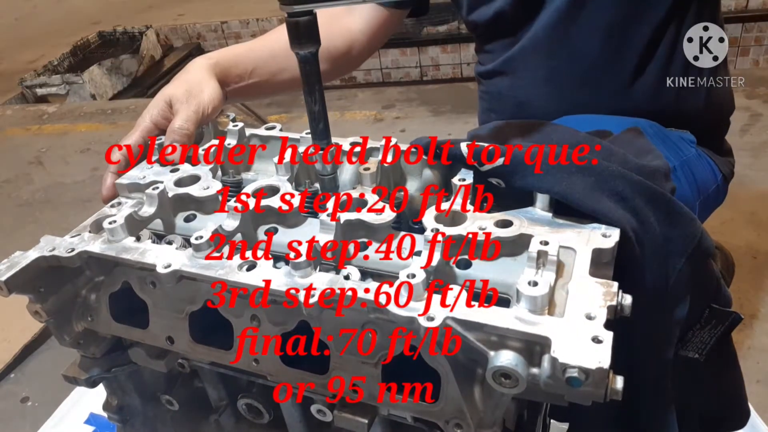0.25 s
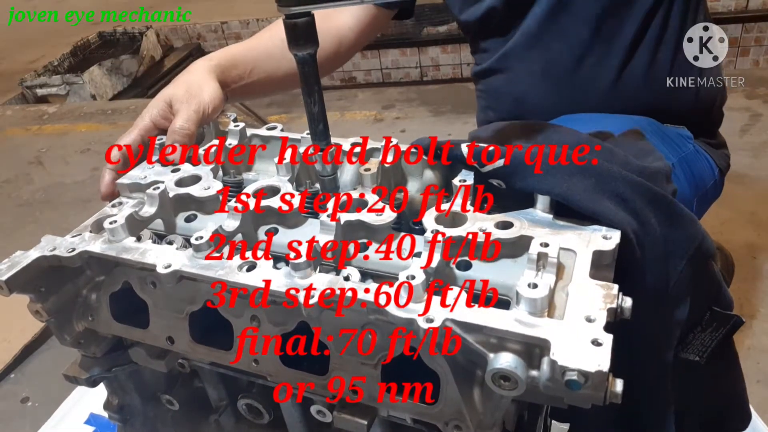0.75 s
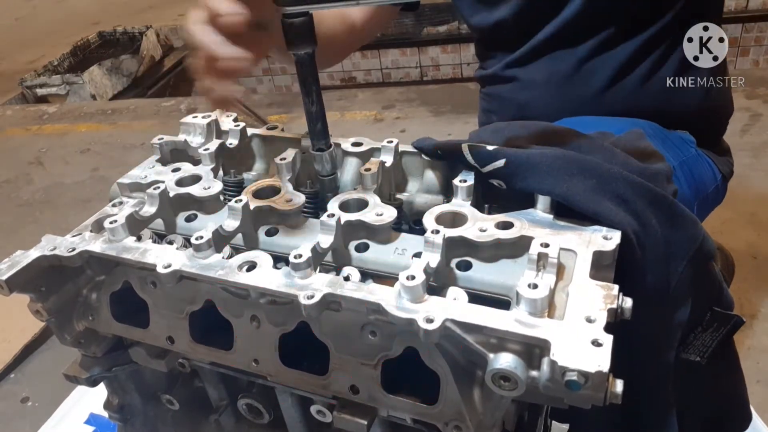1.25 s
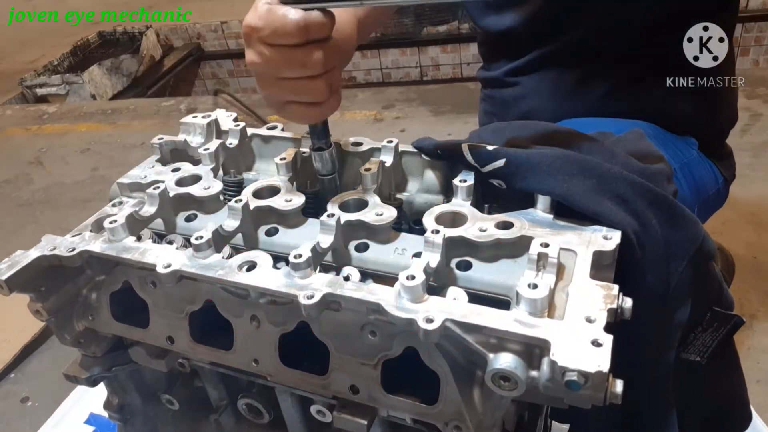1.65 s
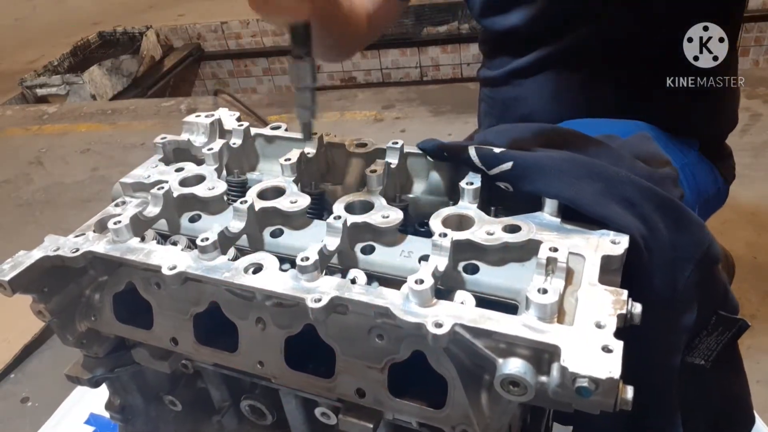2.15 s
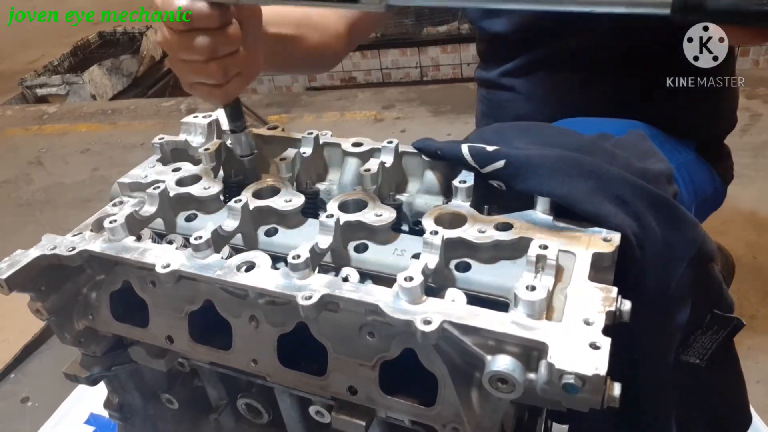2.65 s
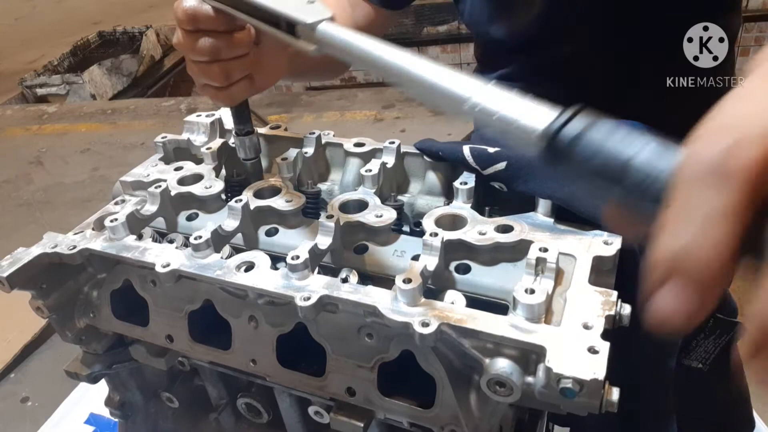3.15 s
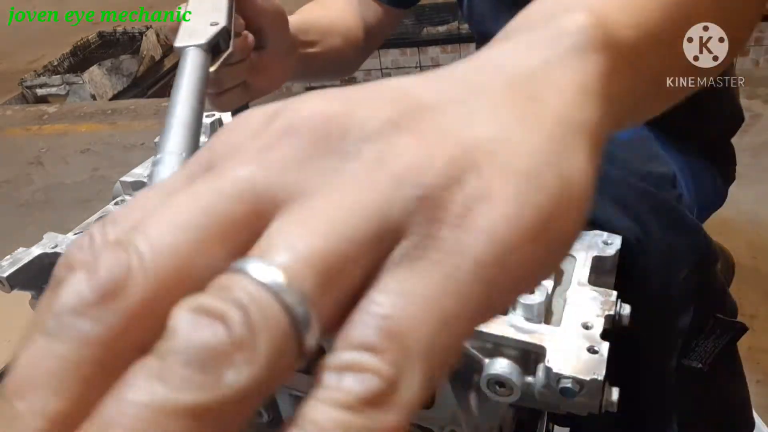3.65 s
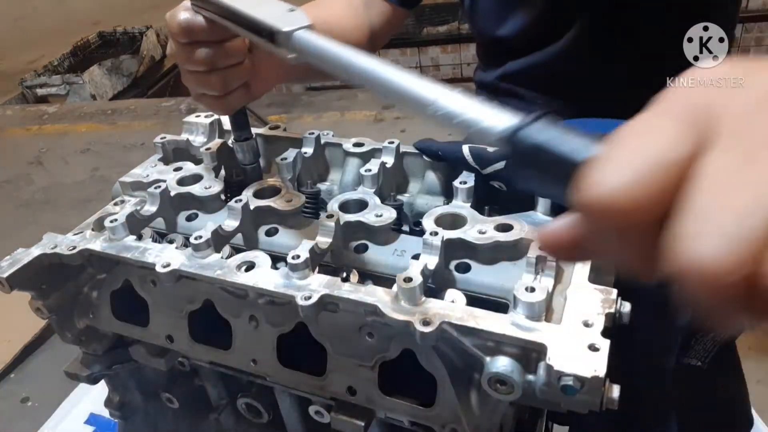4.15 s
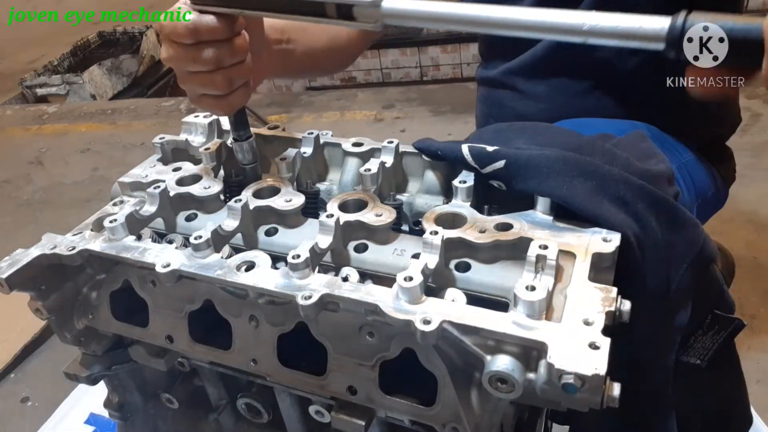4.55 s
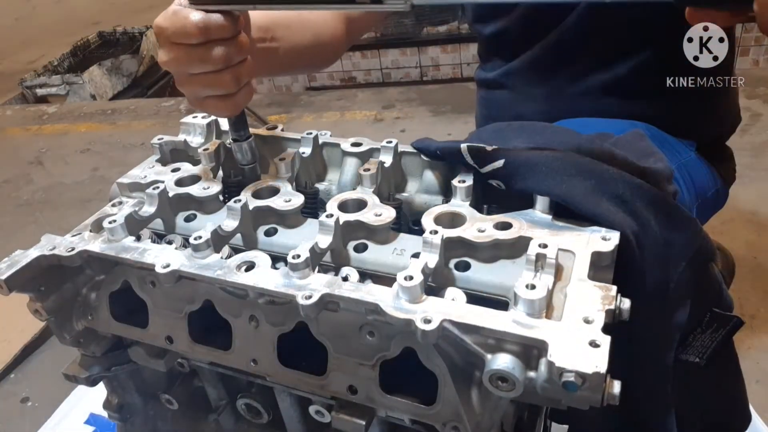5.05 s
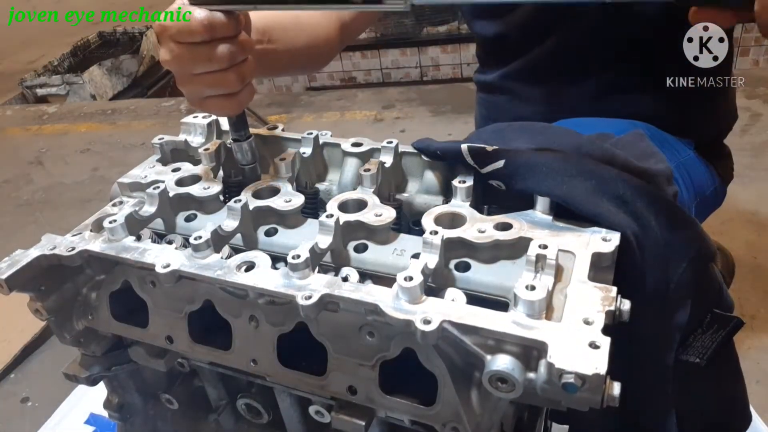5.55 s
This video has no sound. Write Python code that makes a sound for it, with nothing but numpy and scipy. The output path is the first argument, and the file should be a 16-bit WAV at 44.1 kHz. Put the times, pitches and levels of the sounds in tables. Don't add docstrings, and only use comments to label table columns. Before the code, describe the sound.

Open workshop with a far machine whining over low rumble and hiss. Two sharp wrench clicks come early, with low jolts leaning left and splashy room echoes. In the middle are small ringing socket ticks, a soft low rustle, one strong bar knock and tiny very high squeaks. A second pair of cracks ends it, recorded close in stereo.

```python
import sys
import numpy as np
from scipy import signal
from scipy.fft import rfft, irfft, next_fast_len
from scipy.io import wavfile

SR = 44100
rng = np.random.default_rng(int(sys.argv[2]) if len(sys.argv) > 2 else 0)


def wav_out(sig):
    wavfile.write(sys.argv[1], SR, np.round(np.clip(np.atleast_2d(sig).T, -1, 1) * 32767).astype(np.int16))


def level_to_linear(level):
    exponent = np.asarray(level, float) / 20
    return 10 ** exponent


N = 256353

# f/Hz, level/dB per Hz
RUMBLE_SPECTRUM = [(40, -16), (55, -8.5), (80, -5.5), (105, 4.5), (135, -3.5), (300, 0), (450, -5),
                   (800, -13)]
DRONE_SPECTRUM = [(290, -37), (500, -5.5), (667, -9), (864, 2), (1740, 0.5), (1940, -17.5), (2100, 3),
                  (2900, -40)]
HISS_SPECTRUM = [(1800, 3), (4500, -1), (6000, -5.5), (9000, -11.5), (13100, -9.5), (14500, -11.5),
                 (15400, -11), (16000, -60)]
# f/Hz, width/Hz, level/dB
WHINE_BANDS = [(2330, 267, 6), (2442, 192, 4), (3175, 150, -5), (3985, 340, -1.5), (1887, 40, -6),
               (13100, 900, -22)]
# f/Hz, level/dB re whine, left lead/rad
WHINE_LINES = [(1998.5, -10, 1.5), (2057, -20.5, 1.2), (1394, -30.5, 1.4), (3240, -16.5, 2.82),
               (3640, -20.5, 2.13), (2428, -15.5, 1.8), (442.5, -19.5, 0.24), (409.3, -21.5, 0.35),
               (476, -20.5, .3)]
# f/Hz, likeness/1 (-1 to 1)
STEREO_LIKENESS = [(60, 1), (130, 0.94), (290, 0.8), (640, 0.18), (1410, -0.55), (3100, 0.45),
                   (6820, -0.12), (15000, -0.033)]
# t/s, level/dB
MOTOR_NEARNESS = [
    (0.0, -1),
    (1.2, -1.5),
    (1.8, -4),
    (2.6, 1.0),
    (3.0, 1.5),
    (4.7, -1),
    (5.3, 2.5),
    (5.81, 1),
]
# t/s, crack level/dB, jolt level/dB, jolt left-right/dB, jolt length/ms
RELEASES = [
    (0.3659, 2, -4, 9.5, 1.07),
    (0.6831, -2.5, -4, 11, 0.92),
    (5.214, -1.5, -3.5, 18, 1.79),
    (5.5551, 1, -9.5, 2.5, 1.18),
]
GAIN_DIPS = [
    4.5,
    6.3,
    5.9,
    6.5,
]
# f/Hz, level/dB per Hz
CRACK_SPECTRUM = [(700, -3), (1500, -5), (2800, -4.5), (4500, -17), (6500, -4.5), (11000, -2), (15300, -10),
                  (16500, -34)]
CRACK_AT_WALLS = [(700, -17), (1500, -4.5), (2800, -3.5), (6500, 3), (9000, 2), (12000, 4.5), (14500, 2.5),
                  (16000, -4)]
# f/Hz, width/Hz, level/dB
PAWL_MODES = [(6460, 560, -19.5), (11970, 270, -14)]
# f/Hz, width/Hz, gain/1
MOUNT_MODES = [(113, 17, 3.3), (190, 185, 2.2)]
# f/Hz, T60/s
ROOM_T60 = [(500, 1), (2000, 0.83), (6000, 0.55), (10000, 0.36), (14000, 0.29)]
# t/s, length/s, first f/Hz, last f/Hz, level/dB
MOANS = [
    (.695, 0.087, 790, 835, -50),
    (0.78, .12, 812, 812, -56),
    (5.433, 0.21, 780, 775, -52.5),
    (5.633, 0.17, 779, 780, -51.5),
]
# t/s, level/dB, chatter/ms, broad rasp level/dB, room level/dB
TICKS = [
    (2.602, -3, 4.9, -10.5, -15.5),
    (2.713, -12.5, 3.9, -38, -21),
    (3.082, -9, 6.1, -28, -21),
    (3.5434, 4.5, 5, -14.5, -15.5),
    (3.9957, -15.5, 4.7, -31, -19),
]
# f/Hz, width/Hz, level/dB
SOCKET_SEATS = [(960, 20, -3.5), (1400, 300, -19), (1700, 54, 0.5), (3400, 62, -10), (3525, 51, -2.5),
                (3840, 50, -4), (4350, 64, 1), (5170, 76, -9), (5490, 96, -4.5), (6140, 110, -13),
                (7300, 90, -9), (7730, 89, -8), (11950, 180, -5.5), (13030, 310, -20)]
SOCKET_SETTLES = [(1210, 540, -3.5), (2800, 710, -15), (4200, 1100, -18), (970, 30, 3), (1410, 37, 5),
                  (1730, 140, -4), (3590, 120, 7.5), (4250, 140, 3), (5550, 150, 5), (7100, 98, -22),
                  (10950, 180, -12), (12600, 140, -23)]
SOCKET_BITES = [(930, 24, -9), (1387, 38, 3), (1600, 83, 1), (1710, 90, -3), (2620, 110, -15),
                (3330, 380, -7), (3790, 60, -1), (4330, 120, 4), (5250, 140, -2), (5530, 150, -7.5),
                (5870, 130, -12), (7080, 200, -34), (10100, 1100, -15.5), (13200, 200, -13)]
BAR_KNOCKS = [(460, 60, -13), (926, 17, 0.5), (1160, 37, -5), (1400, 160, -9), (1705, 70, -3.5),
              (3610, 75, 1), (4660, 240, -4.5), (5480, 260, -10), (6400, 270, -9.5), (7780, 680, -9.5),
              (9000, 430, -8.5), (9900, 200, -7), (10620, 260, -7), (12600, 1170, -18)]
BAR_RETURNS = [(467, 68, -18), (915, 77, 2.5), (1090, 110, -3), (1380, 100, 1), (2366, 110, -4),
               (3390, 220, -1.5), (3400, 100, -6), (5040, 150, -12), (5960, 330, -13), (6970, 290, -6.5),
               (7900, 180, -26), (10100, 550, -22)]
# t/s, level/dB
SWING_LEVEL = [
    (2.95, -63),
    (2.966, -56),
    (3.108, -33.5),
    (3.5, -46.5),
]
# t/s, length/s, first f/Hz, last f/Hz, level/dB
SHORT_SLIPS = [
    (4.038, 0.058, 13120, 13000, -51),
    (4.095, .056, 13020, 13520, -52),
    (4.414, .06, 13480, 13200, -65),
]
# t/s, f/Hz, level/dB
LONG_SLIP = [(4.135, 13000, -59), (4.155, 13130, -50), (4.19, 13010, -53), (4.212, 12800, -62),
             (4.24, 13140, -52), (4.272, 12600, -60), (4.302, 12100, -65), (4.326, 12470, -58),
             (4.348, 12230, -68)]
# f/Hz, Q/1
LOW_CUT = [(49, 3.0), (66, 1.4)]


def rms_one(x):
    return x / np.sqrt(np.mean(x ** 2) + 1e-20)


def in_time(rows):
    s, *columns = np.transpose(rows)
    return [np.interp(np.arange(N) / SR, s, c) for c in columns]


def at_hz(points, hz):
    table_hz, value = np.array(points).T[:2]
    return np.interp(np.log(hz), np.log(table_hz), value)


def drift(rate):
    r = np.exp(-80 * np.pi * rate / SR)
    noise = rng.standard_normal(N // 40 + 2002)
    slow = signal.lfilter([1], [1, -2 * r, r * r], noise)[2000:]
    return np.interp(np.arange(N) / 40, np.arange(len(slow)), rms_one(slow))


def resonance(x, hz, width_hz):
    r = np.exp(-np.pi * width_hz / SR)
    poles = [1, -2 * r * np.cos(2 * np.pi * hz / SR), r * r]
    return signal.lfilter(np.array([1, 0, -1]) * (1 - r * r) / 2, poles, x)


def coloured(x, spectrum):
    hz = np.maximum(np.fft.rfftfreq(x.shape[-1], 1 / SR), 1)
    closed = [(spectrum[0][0] / 2, -60), *spectrum, (spectrum[-1][0] * 1.3, -60)]
    return irfft(rfft(x) * level_to_linear(at_hz(closed, hz)), x.shape[-1])


def diffuse():
    size = next_fast_len(N)
    mid, side = rfft(rng.standard_normal((2, size)))
    hz = np.maximum(np.fft.rfftfreq(size, 1 / SR), 1)
    alike = np.clip(at_hz(STEREO_LIKENESS, hz), -1, 1)
    return irfft(np.sqrt(1 + alike) * mid + np.sqrt(1 - alike) * side * [[1], [-1]], size)


def pan(db):
    return level_to_linear(np.array([[db / 2], [-db / 2]]))


def add(out, s, sound):
    at = round(s * SR)
    out[..., at:at + sound.shape[-1]] += sound[..., :N - at]


def glide(s, length, first_hz, last_hz, db):
    return [(s + part * length, first_hz + part * (last_hz - first_hz), db - under_db)
            for part, under_db in ((0, 6), (.3, 3.5), (.75, 6.5), (1, 14))]


def wavering_tone(rows, flutter_db):
    hz, db = in_time(rows)
    t = np.arange(N) / SR
    fade = np.clip(np.minimum(t - rows[0][0], rows[-1][0] - t) / 0.0064, 0, 1)
    strength = np.sqrt(2) * fade * level_to_linear(db + flutter_db * drift(30))
    cycles = np.cumsum(hz * (1 + 0.0019 * drift(40))) / SR
    return strength * np.sin(2 * np.pi * cycles)


def gain_dip():
    attack_s, hold_s, recover_s = 0.044, 1.13, 0.7
    since = np.arange(N) / SR - np.array(RELEASES)[:, :1]
    climb = 1 - (since - hold_s) / recover_s
    shape = np.clip(np.minimum(since / attack_s, climb), 0, 1)
    return np.max(np.array(GAIN_DIPS)[:, None] * shape, axis=0)


def machine_whine(air):
    t, left_only = np.arange(N) / SR, np.array([[1], [0]])
    bands = 0
    for hz, width, db in WHINE_BANDS:
        twice = resonance(resonance(air, hz, width), hz, width)
        bands = bands + level_to_linear(db) * rms_one(twice)
    bands = rms_one(bands)[:, :N] * level_to_linear(0.79 * drift(37))
    lines = 0
    for hz, db, lead in WHINE_LINES:
        strength = level_to_linear(db + 5.5 + 1.1 * drift(5))
        lines = lines + strength * np.sin(2 * np.pi * hz * t + lead * left_only + .5 * drift(3.2))
    return bands + lines


def workshop():
    dip, air = gain_dip(), diffuse()
    whine_db = -41 - dip
    rumble_db = -44.5 - dip + 1.0 * drift(6.8)
    drone_db = -47.5 - 0.6 * dip + in_time(MOTOR_NEARNESS)[0] + 1.1 * drift(12)
    hiss_db = -52.5 - 0.99 * dip
    whine = level_to_linear(whine_db) * machine_whine(air)
    rumble = level_to_linear(rumble_db) * rms_one(coloured(air, RUMBLE_SPECTRUM))[:, :N]
    drone = level_to_linear(drone_db) * rms_one(coloured(air, DRONE_SPECTRUM))[:, :N]
    hiss = level_to_linear(hiss_db) * rms_one(coloured(diffuse(), HISS_SPECTRUM))[:, :N]
    return (whine + rumble + drone + hiss) * pan(1.0)


def pawl_crack(t):
    shared, left, right = rng.standard_normal((3, len(t)))
    ports = np.array([np.roll(shared, 2) + .8 * left, shared + .8 * right])
    decay = .5 * np.exp(-t / 0.00045) + 0.066 * np.exp(-t / 0.0079)
    rattle = rms_one(coloured(ports, CRACK_SPECTRUM)) * decay
    ring = sum(level_to_linear(db) * rms_one(resonance(ports, hz, w)) for hz, w, db in PAWL_MODES)
    spike = 0.52 * np.exp(-((t - [[.00013], [.00009]]) / .00003) ** 2)
    return rattle + ring * np.exp(-t / 0.0014) + spike


def microphone_jolt(t, length_ms):
    push = -np.sin(np.pi * np.clip((t - .00015) * 1000 / length_ms, 0, 1))
    return push + sum(gain * resonance(push, hz, w) for hz, w, gain in MOUNT_MODES)


def releases():
    dry, feed, t = np.zeros((2, N)), np.zeros(N), np.arange(8192) / SR
    for s, crack_db, jolt_db, jolt_pan_db, jolt_ms in RELEASES:
        crack = level_to_linear(crack_db) * pawl_crack(t) * pan(5.0)
        jolt = level_to_linear(jolt_db) * microphone_jolt(t, jolt_ms) * level_to_linear([[0], [-jolt_pan_db]])
        add(dry, s, crack + jolt)
        feed[round(s * SR)] = level_to_linear(0.4 * crack_db)
    return dry, coloured(feed, CRACK_AT_WALLS)


def room(feed):
    t, echoes = np.arange(30000) / SR, 0
    for low in 350 * 2. ** np.arange(0, 5.6, .5):
        band = signal.butter(2, [low, min(1.414 * low, 20000)], "band", fs=SR, output="sos")
        noise = signal.sosfilt(band, rng.standard_normal((2, len(t))))
        echoes = echoes + noise * level_to_linear(-60 * t / at_hz(ROOM_T60, low * 2 ** .25))
    echoes = echoes * np.clip(t / 0.0027, 0, 1)
    echoes = echoes / np.sqrt(np.sum(echoes[0] ** 2))
    return signal.fftconvolve(feed[None], echoes, axes=1)[:, :N]


def pipe_moans():
    return sum(wavering_tone(glide(*moan), flutter_db=2.5) for moan in MOANS)


def chatter(t, chatter_ms):
    push = (1 - np.exp(-t / 0.00053)) * (np.exp(-(t * 1000 / chatter_ms) ** 2) + 0.68 * np.exp(-t / 0.011))
    shared, own = rng.standard_normal(len(t)), rng.standard_normal((2, len(t)))
    touching = rng.random(len(t)) < .4
    return push * (np.array([np.roll(shared, 1), shared]) + 0.59 * own) * touching + 1e-18


def ringing(drive, body):
    rings = 0
    for hz, width, db in body:
        mode = np.array([rms_one(resonance(side, hz, width)) for side in drive])
        rings = rings + level_to_linear(db) * np.sqrt(width) * mode
    return rms_one(rings)


def ticks():
    dry, feed, t = np.zeros((2, N)), np.zeros(N), np.arange(6000) / SR
    bodies = SOCKET_SEATS, SOCKET_SETTLES, SOCKET_BITES, BAR_KNOCKS, BAR_RETURNS
    bright = signal.butter(2, [900, 10500], "band", fs=SR, output="sos")
    blow = 1.58 * np.exp(-((t - .0006) / .0001) ** 2)
    snap = rms_one(signal.sosfilt(bright, t == 0))
    for (s, db, chatter_ms, rasp_db, room_db), body in zip(TICKS, bodies):
        contacts = chatter(t, chatter_ms)
        rings = ringing(contacts + blow, body)
        rasp = rms_one(signal.sosfilt(bright, contacts))
        tick = rings + level_to_linear(rasp_db) * rasp
        peak = np.max(np.abs(tick))
        add(dry, s, level_to_linear(db) * tick * pan(3) / peak)
        add(feed, s, level_to_linear(db + room_db) * (0.38 * rings[0] + snap) / peak)
    return dry, feed


def swing():
    start_s, end_s = SWING_LEVEL[0][0] - .05, SWING_LEVEL[-1][0] + .1
    swell_db = in_time([(start_s, -90), *SWING_LEVEL, (end_s, -90)])[0]
    level = level_to_linear(swell_db - 3.5 + 2.16 * drift(29))
    air = diffuse()[:, :N]
    rustle = rms_one(resonance(resonance(air, 250, 250), 250, 250))
    shake = rms_one(resonance(air, 108, 30))
    return level * (rustle + 0.62 * shake)


def joint_squeak():
    long_slip = wavering_tone(LONG_SLIP, flutter_db=2.2)
    short_slips = sum(wavering_tone(glide(*slip), flutter_db=2.5) for slip in SHORT_SLIPS)
    return (long_slip + short_slips) * pan(1.8)


def scene():
    click, click_feed = releases()
    tick, tick_feed = ticks()
    near = click + tick + room(click_feed + tick_feed)
    return workshop() + near + pipe_moans() + swing() + joint_squeak()


def low_pass(x):
    return signal.sosfilt(signal.butter(12, 16600, fs=SR, output="sos"), x)


def record(dry):
    for hz, q in LOW_CUT:
        w = 2 * np.pi * hz / SR
        damp = np.sin(w) / (2 * q)
        zeros = np.array([1, -2, 1]) * (1 + np.cos(w)) / 2
        dry = signal.lfilter(zeros, [1 + damp, -2 * np.cos(w), 1 - damp], dry)
    top_cut = signal.cheby2(10, 35, 15900, fs=SR, output="sos")
    dry = signal.sosfilt(top_cut, dry)
    return low_pass(np.clip(dry, -1, 1))


dry = scene()
out = record(dry)
wav_out(out)
```